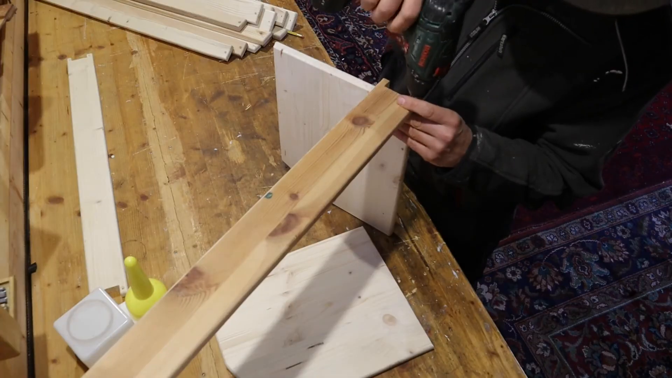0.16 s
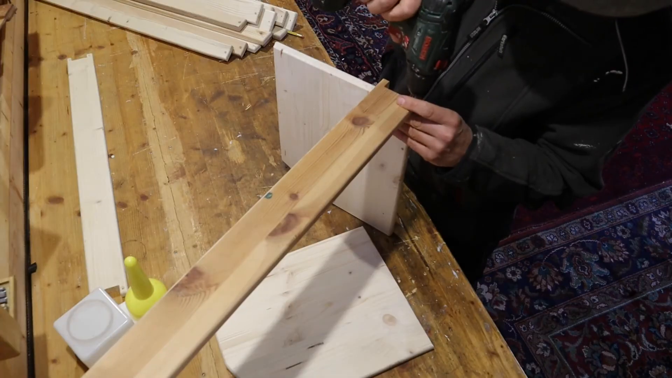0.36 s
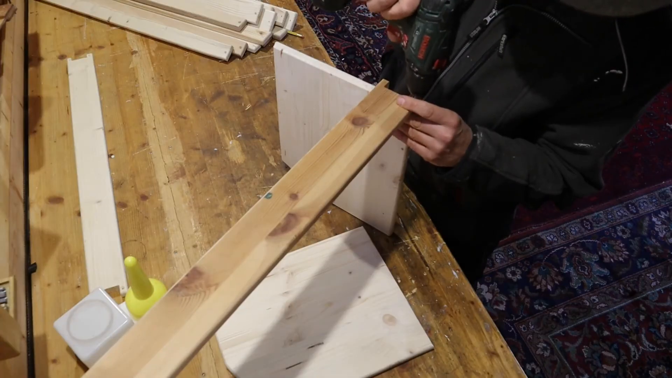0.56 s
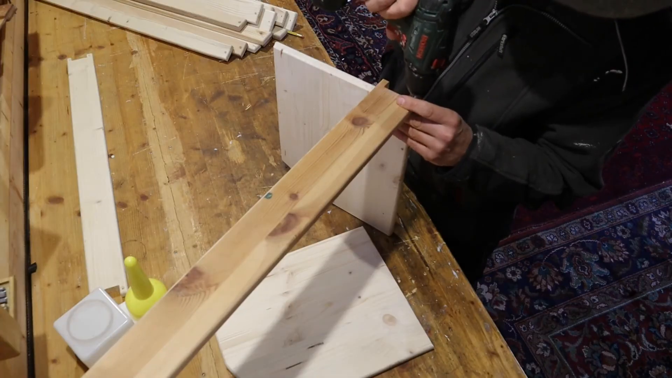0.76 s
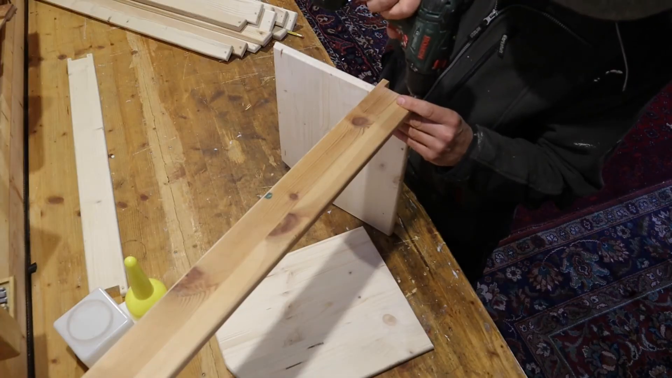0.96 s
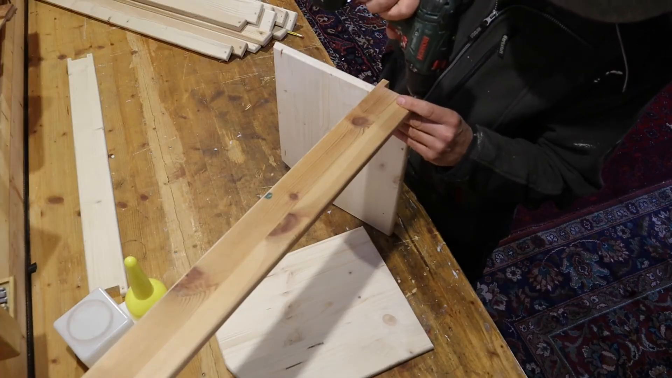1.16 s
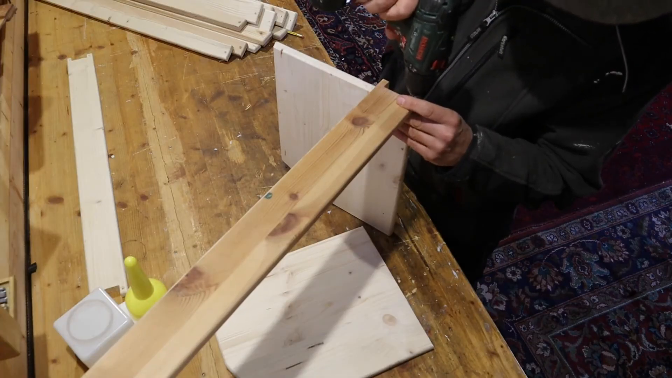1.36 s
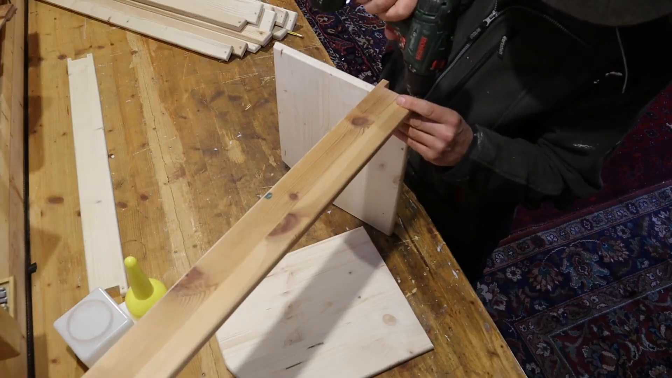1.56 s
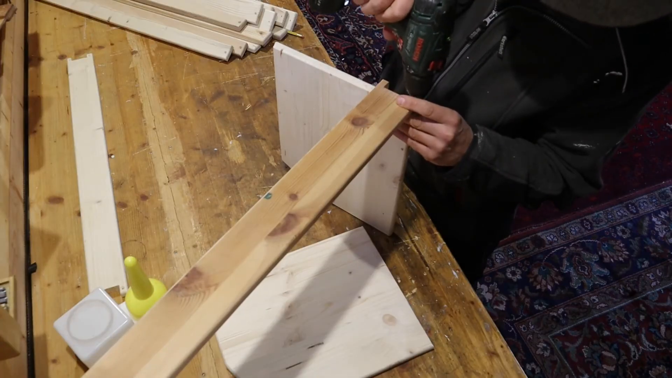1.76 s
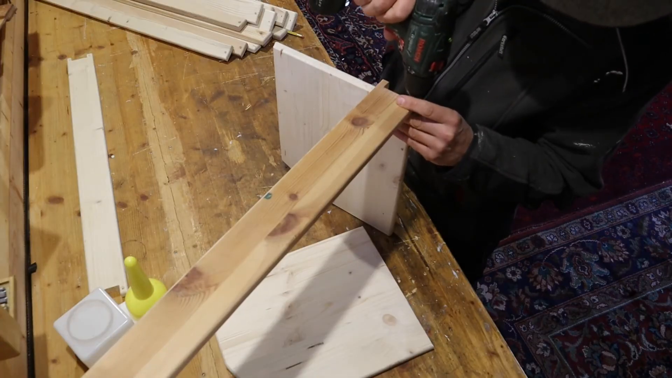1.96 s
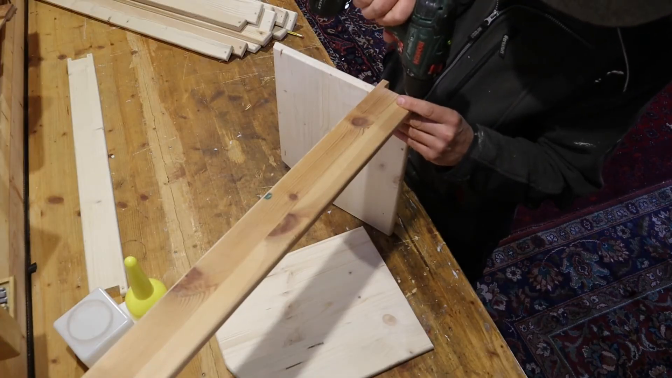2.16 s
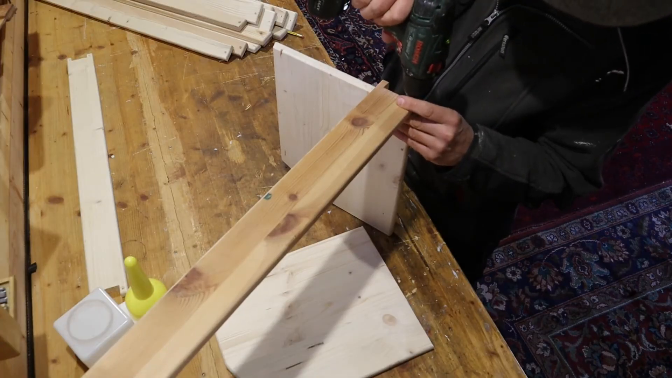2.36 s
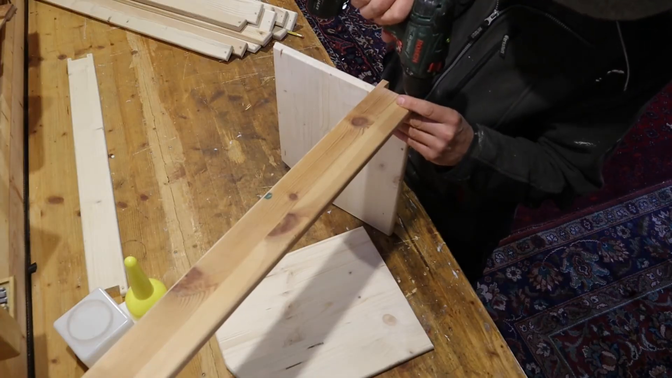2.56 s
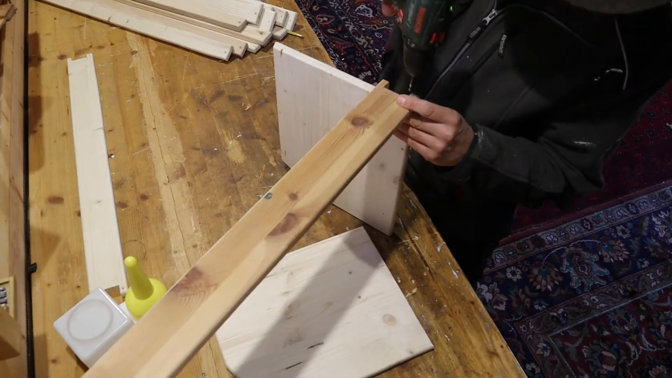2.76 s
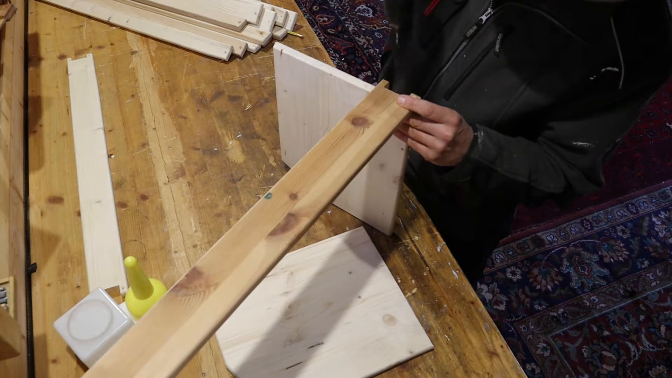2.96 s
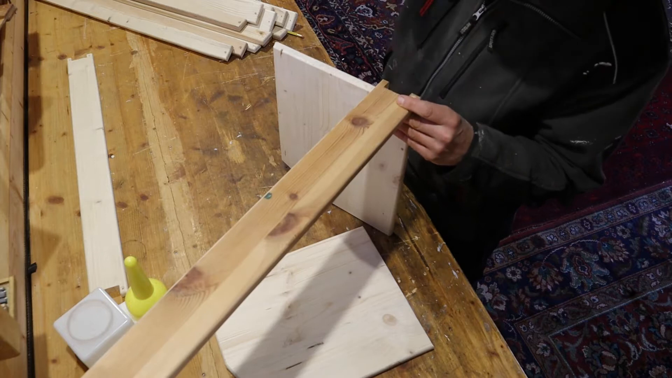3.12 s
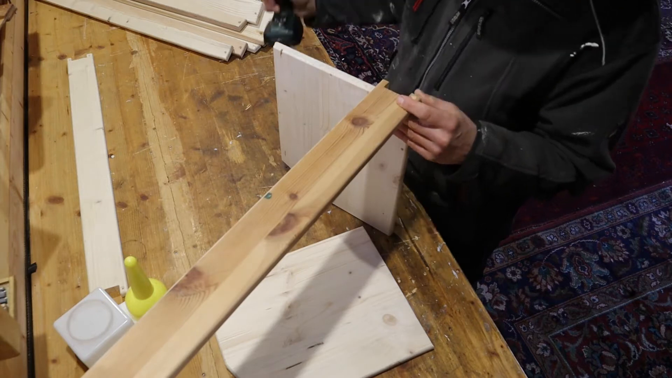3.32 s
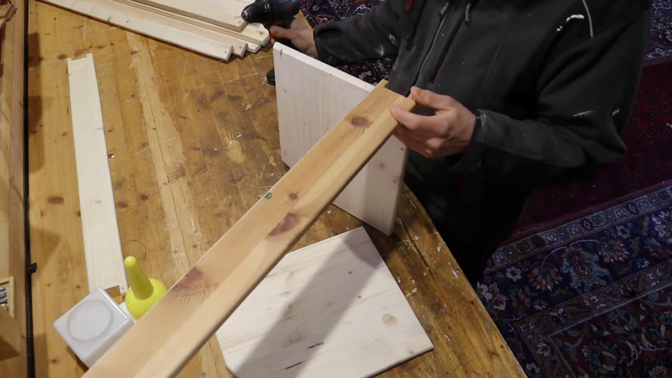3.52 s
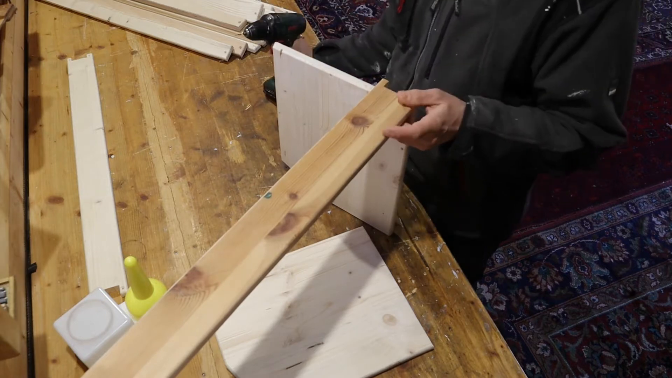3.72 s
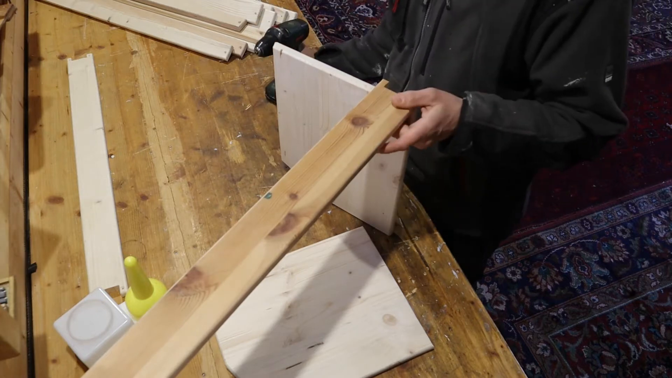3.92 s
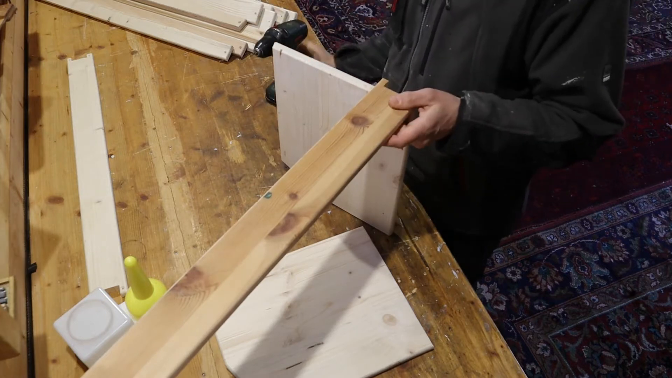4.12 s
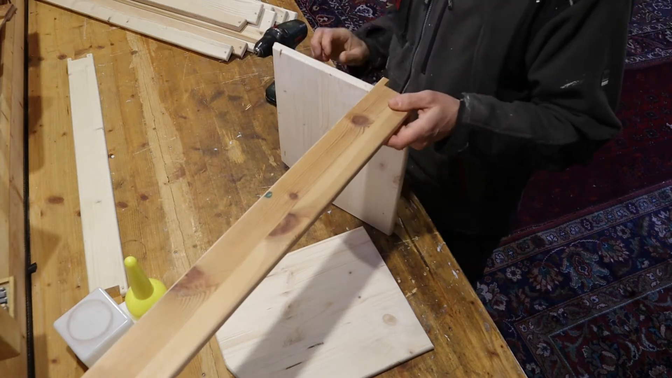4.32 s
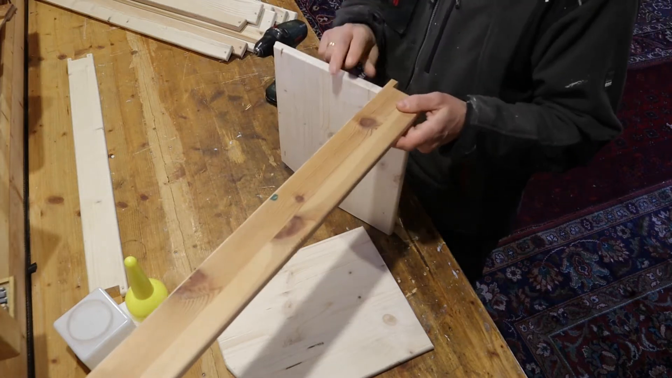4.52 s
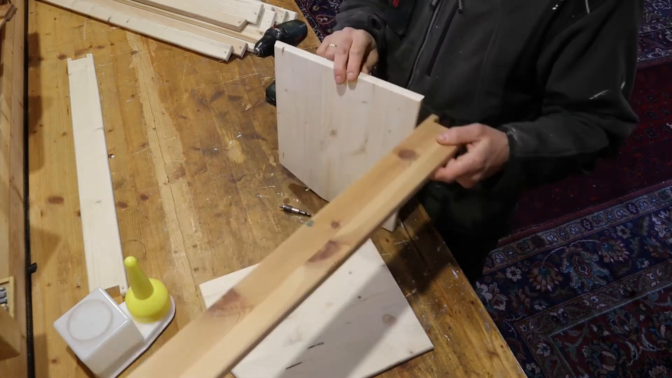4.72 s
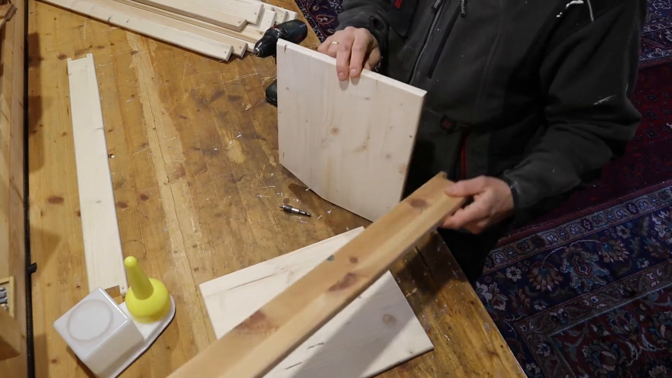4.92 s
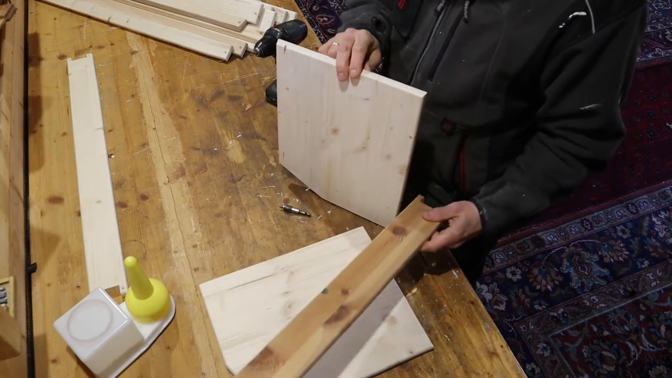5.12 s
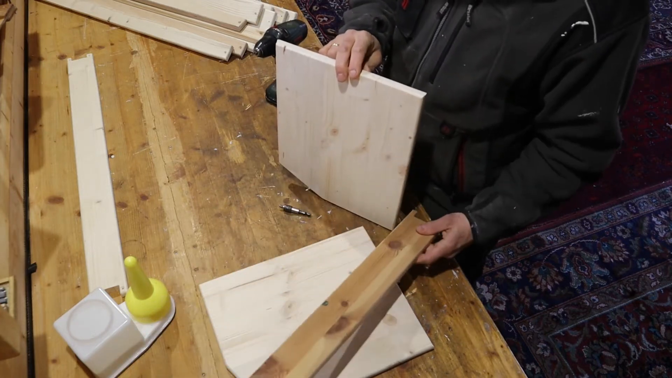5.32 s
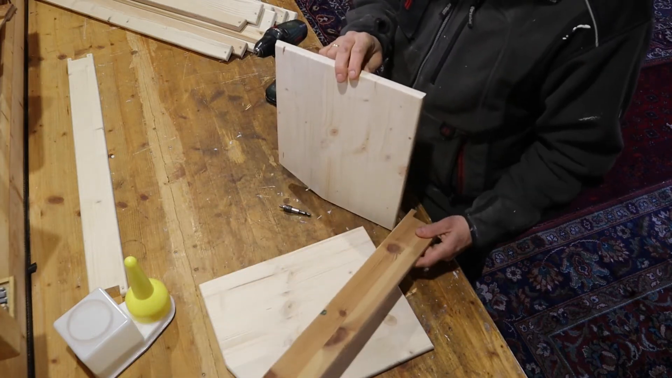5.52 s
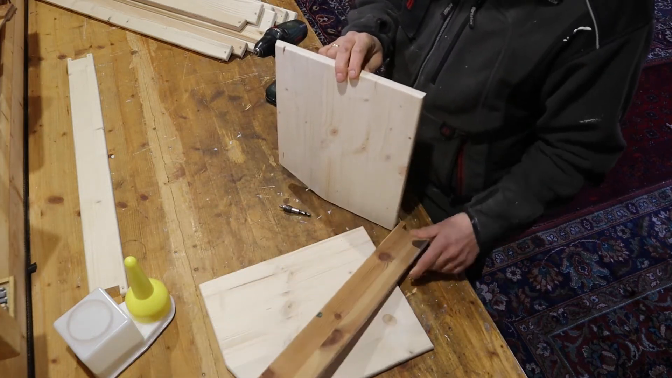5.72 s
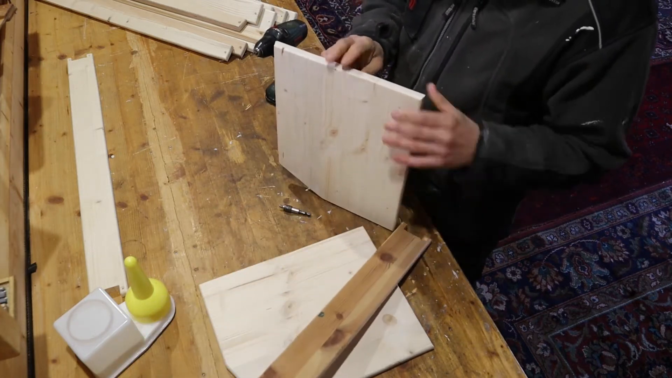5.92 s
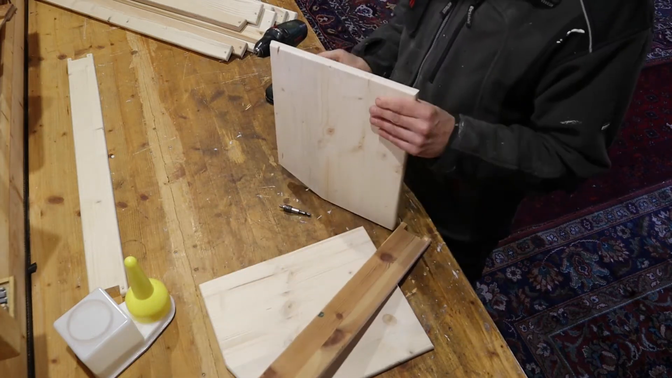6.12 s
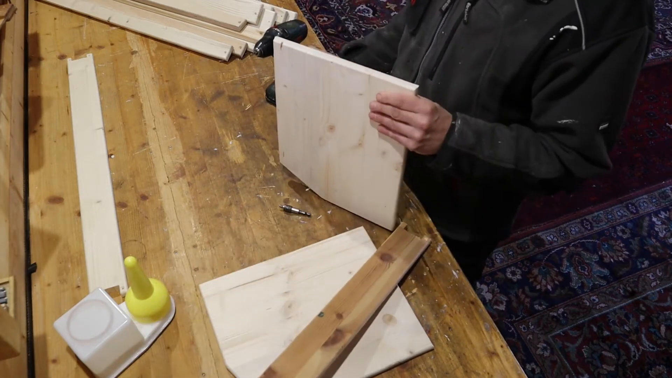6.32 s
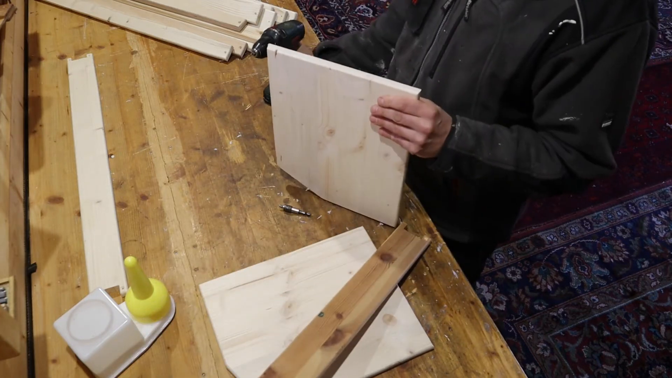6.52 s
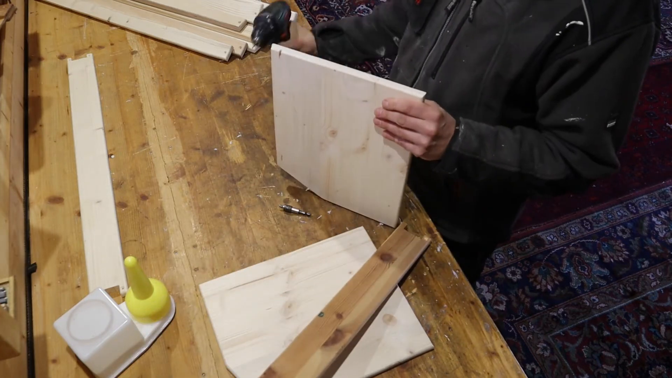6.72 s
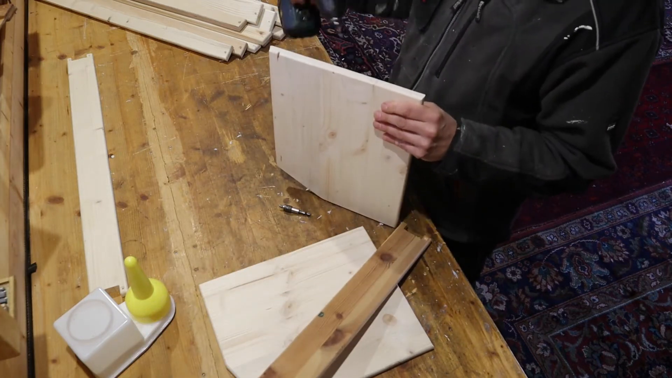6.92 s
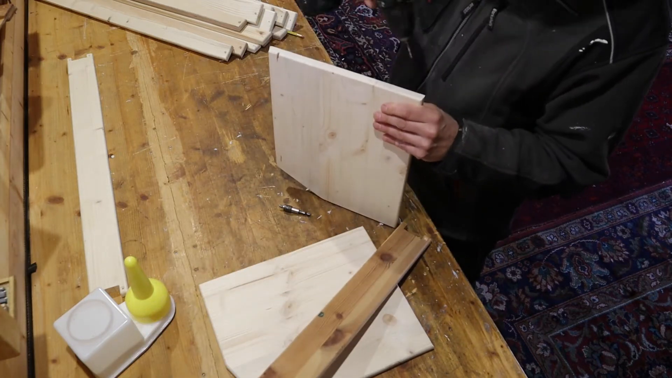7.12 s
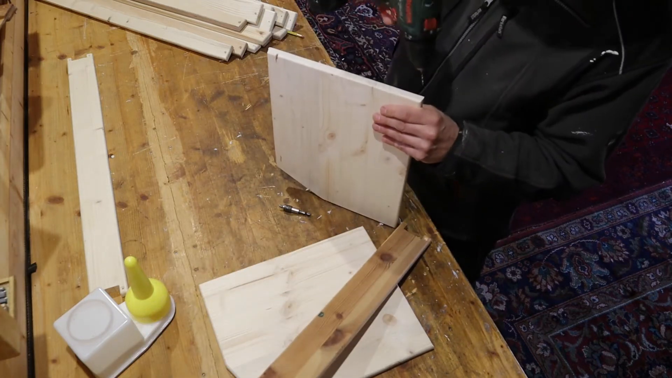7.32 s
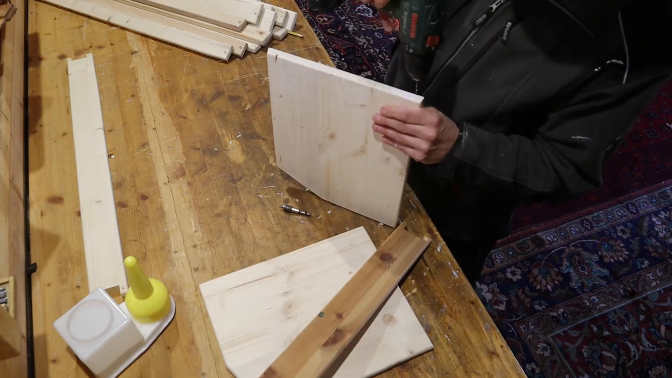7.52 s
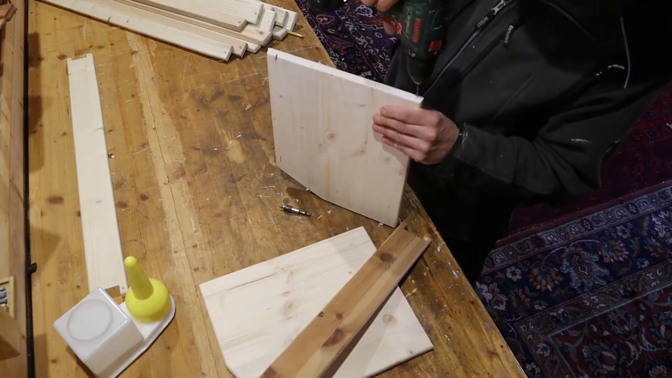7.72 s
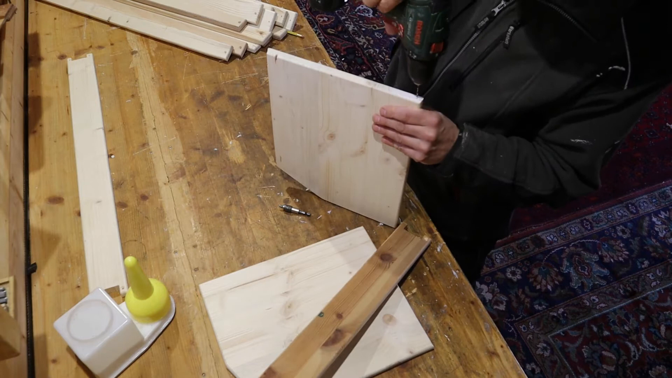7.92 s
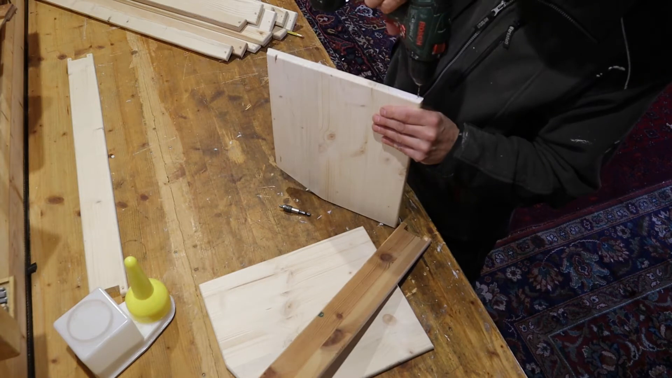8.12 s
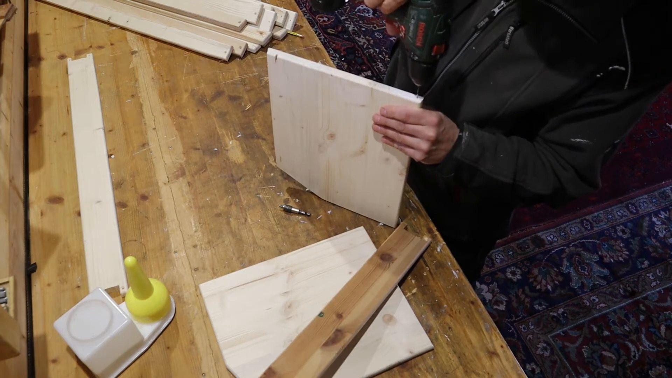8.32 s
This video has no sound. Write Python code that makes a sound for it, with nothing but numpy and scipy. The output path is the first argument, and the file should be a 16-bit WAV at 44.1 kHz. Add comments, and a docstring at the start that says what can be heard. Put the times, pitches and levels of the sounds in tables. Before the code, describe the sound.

In a workshop, a cordless drill starts with a click, whines at part speed, then climbs higher as it bores into a plank with a low growl. It brakes sharply and thuds onto the bench. Boards knock together, and the plank scrapes onto a hollow panel, ringing as it rubs. The drill restarts slowly and quietly at the end. Close microphones also catch rustling sleeves and a low rumble.

```python
"""Cordless drill and boards in a workshop

A drill whines up to speed, its rotor knocking and brushes hissing, bores into a plank and brakes.
It thuds onto the bench. Boards knock together, and the plank slides onto a hollow panel, ringing
as it rubs. Then the drill starts again slowly. Low rumble, room tone and rustling sleeves lie
underneath, heard through a close pair of microphones."""
import sys
import numpy as np
from scipy import signal
from scipy.fft import rfft, irfft, next_fast_len
from scipy.io import wavfile
from scipy.ndimage import uniform_filter1d

SR = 44100
rng = np.random.default_rng(int(sys.argv[2]) if len(sys.argv) > 2 else 0)


def master_out(mix):
    """Clip the mix to full scale and print it as 16-bit PCM to the path in sys.argv[1]."""
    frames = np.transpose(np.atleast_2d(mix))
    ceiling = np.clip(frames, -1, 1)
    pcm = np.round(ceiling * 32767).astype(np.int16)
    wavfile.write(sys.argv[1], SR, pcm)


N = 373968
T = np.arange(N) / SR
FFT_HZ = np.maximum(np.fft.rfftfreq(N, 1 / SR), 1)

# The boring run, then the slow restart. The whine sits at three times the rotor speed.
# Each run: time_s, whine_hz, motor_db, whine_over_motor_db, boring_db
DRILL_RUNS = [
    [(.86, 241.3, -51.5, -25, -57), (.928, 258, -53, -22, -46), (.94, 257.5, -42, -16, -38),
     (.985, 288, -36.5, -3, -37.5), (1.05, 340, -33, -7.5, -50), (1.085, 352.3, -34, 2, -47),
     (1.13, 370, -34, 1.5, -44), (1.2, 380, -34, 1.5, -43), (1.45, 386.6, -33.5, 2, -45),
     (1.66, 383.5, -33, 1.5, -44.5), (1.76, 437, -31.5, -5, -40.5), (1.87, 518, -27.5, -4.5, -38.5),
     (1.92, 583.5, -29, -2.5, -42.5), (1.95, 663, -29.5, -1.5, -39), (1.99, 733, -28, -1, -34),
     (2.06, 803, -27.5, 4.5, -41.5), (2.2, 863.7, -26.5, 3.5, -30), (2.43, 845, -25, -2, -25),
     (2.58, 848.3, -26, 4.5, -30), (2.72, 878, -26.5, -7, -42), (2.82, 890.4, -28.5, 6.5, -46.5),
     (2.9, 830, -27.5, 1, -54), (3.0, 720.5, -31.5, 6.5, -78)],
    [(8.09, 189.9, -51, -30, -64), (8.12, 194, -52, -25, -74), (8.22, 205.2, -49.5, -28, -82),
     (8.35, 208.9, -49.5, -30, -78), (8.4, 217, -47.5, -16, -68), (8.48, 232.7, -48, -17, -52)],
]
# Finger on the trigger: time_s, stage (0 part way, 1 being squeezed, 2 fully in)
TRIGGER = [(1.68, 0), (1.76, 1), (1.925, 1), (1.94, 2), (3.1, 2), (3.2, 0)]
# Colour of the gear noise: freq_hz, level_db
GEAR_COLOUR = [(210, -10), (350, -15), (396, -11), (852, 0.5), (996, -4.5), (1440, 4), (2270, 1.5),
               (2560, 2.5), (3620, -6.5), (5000, -3), (6500, -4), (11000, -120)]


def drill():
    """Whine, rotor knock and brush hiss follow the speed; gears and bit swell on level curves."""
    (stage,), _ = in_time(TRIGGER)
    (first, first_on), (restart, restart_on) = (in_time(run) for run in DRILL_RUNS)
    whine_hz, motor_db, whine_db, boring_db = np.where(T < DRILL_RUNS[1][0][0] - .1, first, restart)
    turns = np.cumsum(whine_hz / 3 * (1 + 0.0018 * drift(34.2))) / SR
    tones = motor_whine(turns, whine_hz, motor_db + whine_db, stage)
    tones += first_on * rotor_hum(turns, motor_db, stage) + switching_tone()
    knock_db = np.minimum(np.interp(stage, (0, 1, 2), (-42.5, -38.5, -48.5)), motor_db + 4)
    knock_db += 7.5 * restart_on   # a rotor that barely turns knocks harder
    knock = amp(knock_db) * rotor_knock(turns)
    hiss = brush_hiss(turns)
    hiss_db = motor_db + 6.5 + 6.5 * np.minimum(np.log2(whine_hz / 407), 0)   # fades at low speed
    gears = amp(motor_db) * coloured(grains(6000, 0.5), GEAR_COLOUR) * amp(drift(6.3))
    running = tones + knock + amp(hiss_db) * hiss + gears + boring_bit(boring_db)
    return (first_on + restart_on) * running + brake(hiss)


# Whine harmonics 1, 2, 3, 4, 5 and 7 by trigger stage: part_way_db, squeezed_db, fully_in_db
WHINE_HARMONICS = [(8, -1, -8.5), (-18, -6, -15.5), (0.5, 4, -25.5), (-3.5, -10, -8.5), (-7, -2, -25),
                   (-16.5, -18.5, -29)]
# Response of the casing: freq_hz, gain_db
CASING_COLOUR = [(250, -8), (400, -9), (530, 13.5), (680, 8), (880, 0.5), (1150, 3), (1400, -3.5),
                 (1750, 3), (2100, 5.5), (3500, 1.5), (6000, 14)]


def motor_whine(turns, whine_hz, level_db, stage):
    """Harmonics sweep through the casing's resonances and waver more once the trigger is squeezed."""
    waver_db = 1.1 * (1 + 1.5 * np.minimum(stage, 1))
    whine = 0
    for k, stages_db in zip((1, 2, 3, 4, 5, 7), WHINE_HARMONICS):
        db = level_db + np.interp(stage, (0, 1, 2), stages_db) + at_hz(CASING_COLOUR, k * whine_hz)
        whine += np.sqrt(2) * amp(db + waver_db * drift(16)) * np.sin(2 * np.pi * 3 * k * turns)
    return whine


# Rotor partials against the motor level: multiple, part_speed_db, full_speed_db
ROTOR_PARTIALS = [(1, -40, -17), (2, -13, -26), (4, -11, -24), (5, -11, -24), (7, -18, -26), (8, -16, -26),
                  (10, -13, -26), (14, -15, -30), (17, -15, -30), (18, -16, -30), (20, -10, -30)]


def rotor_hum(turns, motor_db, stage):
    """Faint wavering partials at multiples of the rotor speed."""
    hum = 0
    for k, part_db, full_db in ROTOR_PARTIALS:
        db = motor_db + np.interp(stage, (0, 2), (part_db, full_db)) + 2 * drift(10)
        hum += np.sqrt(2) * amp(db) * np.sin(2 * np.pi * (k * turns + rng.random()))
    return hum


def switching_tone(start_s=1.2, end_s=1.7, pitch_hz=4091, level_db=-45):
    """The switch chops the current at part speed: a thin, steady tone."""
    _, gate = in_time([(start_s, 0), (end_s, 0)])
    return gate * amp(level_db) * np.sin(2 * np.pi * pitch_hz * T)


# Resonances of the housing: pitch_hz, width_hz, level_db
HOUSING_MODES = [(603, 90, 0), (780, 170, -2), (1150, 170, -7), (1500, 250, -13), (2100, 250, -11),
                 (2500, 150, -22)]


def rotor_knock(turns):
    """One knock a turn rings the housing, with loose gear teeth tapping in between."""
    beats = np.diff(np.floor(turns), prepend=0) * amp(1.6 * rng.standard_normal(N))
    taps = beats + amp(-11) * grains(per_s=700, spread_db=1)
    housing = sum((-1) ** k * amp(db) * ring(taps, hz, 2.2 / width_hz)
                  for k, (hz, width_hz, db) in enumerate(HOUSING_MODES))
    return rms_one(filtered(housing, 2, 430, "high"))   # a small housing radiates no bass


# Colour of the brush hiss: freq_hz, level_db
BRUSH_COLOUR = [(2120, -17), (3600, -16), (3710, -6), (4410, -10.5), (4790, -11.5), (5840, -6.5),
                (6800, -5.5), (7590, 0), (8430, -8.5), (9310, 3.5), (9640, 3), (11200, -0.5),
                (12000, -10.5), (13700, -12.5), (14500, -31.5)]


def brush_hiss(turns):
    """A fine crackle that throbs as the brushes pass the commutator bars."""
    throb = 1 + 0.081 * np.cos(2 * np.pi * 3 * turns)
    return coloured(throb * grains(9000, 0.18), BRUSH_COLOUR) * amp(drift(23))


# Growl of the wood under the bit: freq_hz, level_db
BORING_COLOUR = [(18, -43), (30, -45), (53, -17), (102, -26), (146, 14.5), (207, -10), (237, 10.5),
                 (290, 14), (600, -1.5), (780, 6.5), (1320, -120)]


def boring_bit(level_db, grab_s=2.278, turn_s=.0695, grab_db=7):
    """The edge grabs once a turn and eases off, shaking the wood and, a little later, the floor."""
    grab = grab_db * (.5 - (T - grab_s) / turn_s % 1)
    wood = coloured(rng.standard_normal(N), BORING_COLOUR) * amp(level_db + 0.92 * drift(15) + grab)
    floor_db = np.roll(level_db, int(0.12 * SR)) - 2.5
    floor = coloured(rng.standard_normal(N), RUMBLE_COLOUR) * amp(floor_db + 1.4 * drift(20))
    return wood + floor


# Jolts of the casing: start_s, level_db, pitch_hz, t60_s
CASING_JOLTS = [(2.998, -10, 640, .045), (3.006, -14, 1340, .03), (8.104, -33, 5900, .02)]


def brake(hiss):
    """The brushes spit as the brake shorts the motor; a dead stop or catching gears ring the casing."""
    spit = dying([(2.998, -17)], db_per_s=356) * hiss
    return spit + sum(ring(impulses([(s, db)]), hz, t60) for s, db, hz, t60 in CASING_JOLTS)


# Three cue lists of blows; the crack is set against the blow's loudest band.
# Columns: start_s, level_db, bass_db, treble_db_per_octave, crack_db, t60_s
# Trigger, brake, chuck and other small hard ticks
CLICKS = [ (.4, -34.5, 18, -1.5, -7, 0.14), (.415, -50, 27, -3, 13, .078), (.905, -19.5, 11, -5, -19, 0.49),
          (.933, -17, 15, 1, 2.5, 0.12), (1.929, -29, 12, -17, 10, 0.077),
          (2.999, -3, -34, -1.5, -1.5, 0.052), (3.007, -14, -29, 3.5, 6.5, 0.11),
          (3.055, -16, -19, -2, 3, 0.095), (3.136, -44.5, -6, 7.5, -1, 0.15), (3.35, -47, 7, 4, 0, 0.17),
          (4.0, -51.5, 41, 7.5, 5, 0.1), (4.581, -26.5, 5, -4.5, -5, 0.045),
          (6.754, -79.5, 22, 12.5, -24, .08), (6.978, -55.5, 13.5, 5.5, 1, 0.064),
          (8.035, -52, 0, 9, 10, 0.15), (8.105, -40, -5, 5.5, 15, 0.096)]
# The drill lands on the bench and rocks; a board end meets the floor
THUDS = [(0.069, -76, 4, 14, 11, 0.17), (3.749, -10.5, 0.44, 3, 10, 0.13), (3.976, -30.5, 8.9, -1, 2, 0.19),
         (4.09, -40.5, 1.9, -3, 8, 0.74), (5.313, -49.5, 8.8, 7.5, -27, 0.49)]
# Boards knock together
BOARD_KNOCKS = [ (4.643, -51.5, 35, 5, 0, 0.41), (4.708, -8.5, 5.5, 5, -2.5, 0.093),
                (4.862, -17, 21.5, 5, -3, 0.092), (4.873, -4.5, 11, -5, -9, 0.025),
                (4.913, -29.5, 18.5, 5, 0, 0.35), (5.017, -48.5, 25, 7.5, 1, 0.086),
                (5.117, -50, -12, 1.5, 4, 0.057), (5.262, -10, 4, 1.5, -9, 0.075),
                (5.286, -10, 5, -2.5, -39, 0.069), (5.298, -36.5, 1, 8.5, -17, 0.18),
                (5.350, -52.5, -5, 11.5, -2, 0.095), (5.529, -13, 2.5, -7.5, -30, 0.11),
                (5.582, -40, 9, 8.5, 4, 0.28), (5.697, -31, 8, -4, -18, 0.72),
                (5.823, -3.5, 7, 0.5, -9, 0.1), (5.831, -15, 18, 4.5, -6, 0.035),
                (5.895, -14, 19, -39, -1, 0.14), (5.919, -8.5, 3, -20, 0, 0.052),
                (5.932, -7.5, -29, 2.5, -5.5, 0.078), (6.146, -10.5, -13, -3, 4, 0.29),
                (6.358, -12.5, 11, 4.5, 0, 0.25), (6.551, -25, 10.5, -6, -4, 0.57),
                (6.686, -55, -6, 11, -6, 0.091), (6.723, -40.5, 5, -19, -30, 0.077),
                (6.955, -67, 4, -6, 3.5, 0.07), (7.821, -29, 17, -8.5, -4, 0.32),
                (8.007, -22.5, 8, -3.5, -4, 0.49)]
# The six bands of a blow: band_hz
BANDS_HZ = [70, 220, 660, 1750, 4300, 9200]
# Colour of each kind of blow, band by band: gain_db
CLICK_COLOUR = [-51.5, -29, -10.5, -3.5, -1.5, -15]
THUD_COLOUR = [-10, -7, -3.5, -7, -9.5, -26]
BOARD_COLOUR = [-37, -17, -3, 0, -17, -33.5]


def blows():
    """Voice each blow by tilting the colour of its kind. Small ticks ring the wood less."""
    octaves = np.log2(np.array(BANDS_HZ) / 660)
    bass_share = (octaves < 0) * np.where(octaves < -2, 0.16, 1)   # little reaches the lowest band
    kinds = (CLICKS, CLICK_COLOUR, -5.5), (THUDS, THUD_COLOUR, 0), (BOARD_KNOCKS, BOARD_COLOUR, 0)
    voiced = []
    for cues, colour_db, ring_db in kinds:
        for s, db, bass_db, treble_db, crack_db, t60 in cues:
            band_db = db + np.array(colour_db) + bass_db * bass_share + treble_db * np.maximum(octaves, 0)
            voiced.append((s, band_db.max() + crack_db, band_db, max(t60, .03), ring_db))
    return voiced


# Attack of the noise burst against the blow, band by band: gain_db
BURST_DB = [7, -6.5, -8, -11.5, -9, 0.5]


def knocks():
    """Each blow is a crack of first contact, a burst that dies sooner in the treble, and ringing wood."""
    track, t = np.zeros(N + SR), T[:SR // 2]
    white = rng.standard_normal(N + SR)
    edges_hz = [(hz / 1.42, min(hz * 1.794, 15000)) for hz in BANDS_HZ]
    noises = [rms_one(filtered(white, 3, edges, "band")) for edges in edges_hz]
    clicks = np.array([filtered(1. * (t == 0), 3, edges, "band") for edges in edges_hz])
    clicks /= np.max(np.abs(clicks), axis=1, keepdims=True)
    for s, crack_db, band_db, t60, ring_db in blows():
        span = slice(round(s * SR), round(s * SR) + len(t))
        crack = amp(band_db) @ clicks
        track[span] += amp(crack_db) * crack / np.max(np.abs(crack))
        for hz, db, noise in zip(BANDS_HZ, band_db + BURST_DB, noises):
            rise = np.minimum(t * hz, 1)   # a band needs a cycle to build up
            fall_db = 60 * t / t60 * (hz / 660) ** 0.41
            track[span] += rise * noise[span] * amp(db - fall_db)
        track[span] += wood_ring(t, s, band_db + ring_db, t60)
    return track[:N]


# Modes of the bench and of a board: pitch_hz, level_db, longest_t60_s
BENCH_MODES = [(61.7, 0.5, 0.695), (79, 19, .5), (109.5, 12.5, 0.87), (156, -22, 0.14), (251.3, -2.5, 0.45)]
BOARD_MODES = [(281.5, -6, 0.15), (336, -2, 0.075), (437, 4.5, 0.037), (516.5, 4, 0.045), (590, 2.5, 0.081),
               (774, 0.5, 0.044), (838, -20.5, 0.14), (1212, -5, 0.016), (1360, -35.5, 0.067),
               (1800, -11.5, 0.04), (1884, -5, 0.075), (2126, -4, 0.038), (2335, 1.5, 0.025),
               (3255, 4, 0.0075), (4180, 4.5, 0.0082)]
# Where a blow lands favours the modes near one pitch: start_s, pitch_hz, gain_db
STRIKE_SPOTS = [(3.136, 2335, 11.5), (4.581, 1990, 20), (4.708, 1900, 6.5), (5.262, 580, 5.5),
                (5.286, 595, 6.5), (5.831, 1250, -1), (5.933, 2310, 6.5), (6.357, 3120, 7),
                (6.978, 1860, 18), (8.007, 596, 4.5)]


def wood_ring(t, start_s, band_db, blow_t60):
    """Bench and board modes take on the colour of the blow; a short blow cuts their ring short."""
    colour, wood = list(zip(BANDS_HZ, band_db)), 0
    for hz, mode_db, longest_t60 in BENCH_MODES + BOARD_MODES:
        spot_db = sum(db * np.exp(-(np.log2(hz / near_hz) / .2) ** 2)
                      for s, near_hz, db in STRIKE_SPOTS if abs(s - start_s) < .004)
        level_db = at_hz(colour, hz) + mode_db + spot_db - 5 + 1.53 * rng.standard_normal()
        t60 = max(min(longest_t60, 1.32 * blow_t60), .01)
        rise = np.minimum(t * hz, 1)
        wood += rise * amp(level_db - 60 * t / t60) * np.sin(2 * np.pi * hz * t)
    return wood


# The sliding gesture: time_s, body_db, push_db
SLIDE_MOVE = [(5.66, -64, -59), (5.81, -66, -73), (5.83, -66, -62), (5.9, -49, -31), (5.935, -46, -26),
              (5.96, -52, -23.5), (6.0, -29, -22.5), (6.07, -25, -21), (6.135, -27, -26.5),
              (6.154, -23, -22.5), (6.23, -28.5, -26.5), (6.326, -40, -34), (6.364, -21, -55),
              (6.5, -34, -31), (6.726, -61, -87), (6.8, -78, -79)]
# Modes of the plank: pitch_hz
PLANK_HZ = [221, 388, 592, 689, 743, 814, 877, 931, 1007, 1114, 1150, 1233, 1410, 1519, 1626, 1707, 1761,
            1954, 2008, 2195, 2250, 2422, 2509, 2745, 2966, 3305, 4226, 4280, 5216, 5588, 6347]
# The ring of each of those modes: level_db, t60_s
PLANK_RING = [(-16, 0.44), (-19, 0.71), (-8, 0.35), (-11, 0.6), (-5, 0.25), (-8, .3), (-12, 0.55),
              (-6, 0.3), (-11, 0.25), (-8, 0.25), (-11, 0.45), (-10, 0.25), (-2, 0.35), (-1, .3),
              (-6, 0.65), (-4, 0.3), (-9, 0.45), (-10, 0.28), (-12, 0.35), (-7, 0.5), (-9, 0.35), (-13, .3),
              (-10, 0.26), (-13, 0.2), (-11, .3), (-13, .3), (-11, .3), (-10, .3), (-12, .27), (-12, .16),
              (-14, .22)]
# Lying on the panel, the plank is rubbed elsewhere and feeds other modes: freq_hz, gain_db
LANDED_COLOUR = [(600, 0), (689, 5), (743, -6), (877, 2), (1007, -8), (1150, 2), (1233, -6), (1410, -8),
                 (1519, -10), (1626, 7), (1707, -6), (2008, -4), (2195, 3), (2250, 2), (2500, -3)]
# Colours of the plank's body and of its surface hiss: freq_hz, level_db
BODY_COLOUR = [(71, -50), (120, -69), (219, 8), (254, -22), (386, -24), (472, -42), (577, 11), (627, -20),
               (729, -2), (1290, 2), (1740, 7), (6500, -22.5), (8450, -65), (14300, -120)]
SURFACE_COLOUR = [(1470, -34), (2500, -2.5), (3480, -12), (4390, -8.5), (4820, -16), (6340, -11),
                  (9690, -10), (11900, -17), (14000, -61)]


def plank_slide(lands_s=6.33, push_cut_hz=2600):
    """Dense rubbing shakes the plank's body, feeds its long-ringing modes and hisses at the surface."""
    (body_db, push_db), gate = in_time(SLIDE_MOVE)
    rub = rms_one(grains(6000, 0.14))
    strikes = impulses([(s, db - 6.5) for s, db, *_ in BOARD_KNOCKS])   # knocks ring the sliding plank
    strikes = filtered(strikes + 1e-18, 4, push_cut_hz, "low")
    scuffs = dying([(6.146, -20.5), (6.358, -24)], db_per_s=189)   # the surfaces bite twice
    # Slow rubbing misses the high modes; the scuffs reach them all.
    push = filtered(amp(push_db) * rub, 4, push_cut_hz, "low") + amp(-2) * scuffs * rub
    modes = 0
    for hz, (db, t60) in zip(PLANK_HZ, PLANK_RING):
        landed = amp((T > lands_s) * at_hz(LANDED_COLOUR, hz))
        drive = gate * landed * (push + rng.choice([-1, 1]) * strikes)
        modes += amp(db) * ring(drive, hz, t60) * np.sqrt(20 / (t60 * SR))
    body = amp(body_db) * coloured(rub, BODY_COLOUR)
    surface = (amp(push_db - 55) + scuffs) * coloured(rub, SURFACE_COLOUR)
    return modes + gate * (body + surface)


# Hollow body of the upright panel: pitch_hz, level_db, t60_s
PANEL_MODES = [(318, 0, .06), (478, -1, .05), (742, -5, .15)]
# The bit's hardest grabs, then bumps of plank and hands: start_s, level_db
PANEL_BUMPS = [(2.283, -23), (2.418, -17), (2.556, -24), (4.863, -14), (4.869, -10), (4.914, -17),
               (5.826, -14), (6.362, -21), (6.43, -26), (6.726, -33), (6.955, -39)]


def panel():
    """Each bump sets the panel's low modes ringing."""
    bumps = impulses(PANEL_BUMPS)
    return sum(amp(db) * ring(bumps, hz, t60) for hz, db, t60 in PANEL_MODES)


# Level rides of the background: time_s, rumble_db, rustle_db
AMBIENCE_LEVELS = [(0.0, -33.5, -52.5), (0.21, -48.5, -55.5), (0.75, -46.5, -59.5), (3.1, -52, -60.5),
                   (3.7, -46, -58), (4.5, -45, -54), (4.75, -34.5, -63), (5.08, -46, -70),
                   (5.8, -49.5, -48), (6.1, -77, -55), (6.45, -63, -50), (6.66, -42, -56.5),
                   (6.92, -46, -81.5), (7.3, -49.5, -63), (7.9, -48.5, -65), (8.48, -54, -50.5)]
# Colours of floor rumble, room tone and sleeves: freq_hz, level_db
RUMBLE_COLOUR = [(12, -35), (20, -7.5), (49, 9.5), (62, -10), (70, -4.5), (156, -10), (200, -16.5),
                 (260, -61), (440, -120)]
ROOM_TONE_COLOUR = [(71, -45), (120, -10), (302, -1), (334, -4.5), (489, -5.5), (647, -4), (1210, -9),
                    (1310, -9.5), (1800, -12.5), (2640, -16), (14500, -31)]
SLEEVE_COLOUR = [(700, -14), (1300, 8), (2030, 9), (2580, 8), (4470, 3), (5600, 1), (7500, -4), (10100, 8),
                 (12000, 0.5), (14500, -13)]


def ambience(tone_db=-54.5, side_boost_db=4):
    """A floor that rumbles and booms after each thud, wide room tone and patchy sleeve rustle."""
    (rumble_db, rustle_db), _ = in_time(AMBIENCE_LEVELS)
    boom = dying([(s, db + bass_db - 8) for s, db, bass_db, *_ in THUDS], db_per_s=81)
    swell = (amp(rumble_db) + boom) * amp(3 * drift(8))
    rumble = swell * coloured(rng.standard_normal(N), RUMBLE_COLOUR)
    mid, side = (amp(tone_db) * coloured(rng.standard_normal(N), ROOM_TONE_COLOUR) for _ in range(2))
    sleeves = amp(rustle_db + 1.8 * drift(8)) * coloured(grains(8000, 0.73), SLEEVE_COLOUR)
    return rumble + mid, amp(side_boost_db) * side, sleeves


# EQ of the reverb: freq_hz, gain_db
REVERB_COLOUR = [(60, 5), (500, 3.5), (3000, -5.5), (6000, 1), (12000, 10.5)]


def workshop_reverb(send):
    """The room's short tail, dying fastest in the top treble."""
    return equalised(echoes(send, [(60, 0.41), (300, 0.38), (2000, 0.44), (10000, 0.13)]), REVERB_COLOUR)


# EQ of the reflections in the side channel: freq_hz, gain_db
SIDE_COLOUR = [(60, -60), (99, -41), (160, -30), (270, -21), (440, -13), (720, -11), (1180, -8), (1940, -4),
               (3190, -0.5), (5250, 0), (8620, -8), (11500, -10), (14200, -7)]
# The boards are handled left of centre: time_s, side_share
LEFT_LEAN = [(4.3, 0), (4.6, 0.12), (5.1, 0.016), (5.9, 0.022), (6.1, 0)]


def stereo_side(near):
    """The two microphones differ by early and late reflections and by a lean to the left."""
    early = .42 * echoes(near, [(60, .05), (10000, .01)])
    late = .85 * echoes(near, [(60, 0.4), (10000, 0.2)])
    return equalised(early + late, SIDE_COLOUR) + np.interp(T, *np.transpose(LEFT_LEAN)) * near


def echoes(x, t60s):
    """x through reflections that die octave by octave; t60s holds (freq_hz, t60_s)."""
    size, t = next_fast_len(N + SR), T[:SR]
    tail = 0
    for hz in 45 * 2. ** np.arange(9):
        octave = filtered(rng.standard_normal(SR), 2, [hz / np.sqrt(2), hz * np.sqrt(2)], "band")
        tail += octave * amp(-60 * t / at_hz(t60s, hz))
    tail /= np.sqrt(np.sum(tail ** 2))
    return irfft(rfft(x, size) * rfft(tail, size), size)[:N]


def amp(db):
    """dB to gain."""
    return 10 ** (np.asarray(db) / 20)


def rms_one(x):
    """x scaled to rms 1."""
    return x / np.sqrt(np.mean(x ** 2) + 1e-20)


def in_time(rows):
    """A table's columns as curves, and a soft gate open from its first time to its last."""
    s, *columns = np.transpose(rows)
    gate = uniform_filter1d(1. * ((T >= s[0]) & (T <= s[-1])), size=200)
    return [np.interp(T, s, c) for c in columns], gate


def at_hz(points, hz):
    """A curve read on a log frequency axis."""
    freqs, values = np.transpose(points)
    return np.interp(np.log(hz), np.log(freqs), values)


def filtered(x, order, hz, kind):
    """x through a low-, high- or band-pass."""
    return signal.sosfilt(signal.butter(order, hz, kind, fs=SR, output="sos"), x)


def equalised(x, curve):
    """x through an EQ curve of (freq_hz, gain_db)."""
    return irfft(rfft(x) * amp(at_hz(curve, FFT_HZ)), N)


def coloured(x, curve):
    """x shaped by a curve that runs to -70 dB an octave beyond its ends; rms 1."""
    return rms_one(equalised(x, [(curve[0][0] / 2, -70), *curve, (curve[-1][0] * 2, -70)]))


def drift(rate_hz):
    """A smooth random wander, rms 1."""
    r = np.exp(-2 * np.pi * rate_hz / SR)
    return rms_one(signal.lfilter([1], [1, -2 * r, r * r], rng.standard_normal(N + SR))[SR:])


def grains(per_s, spread_db):
    """Random small clicks of uneven size."""
    sizes = amp(spread_db * np.minimum(rng.exponential(1, N), 5)) * rng.standard_normal(N)
    return sizes * (rng.random(N) < per_s / SR)


def impulses(events):
    """One click for each (start_s, level_db)."""
    track = np.zeros(N)
    for s, db in events:
        track[round(s * SR)] = amp(db)
    return track


def ring(x, hz, t60):
    """One mode: a unit click starts a decaying sine of height 1."""
    r, w = amp(-60 / (t60 * SR)), 2 * np.pi * hz / SR
    return signal.lfilter([0, np.sin(w)], [1, -2 * r * np.cos(w), r * r], x + 1e-18)


def dying(events, db_per_s):
    """A gain that jumps at each (start_s, level_db) and falls steadily."""
    return sum((T >= s) * amp(db - db_per_s * np.abs(T - s)) for s, db in events)


def scene():
    """Drill, wood and sleeves with their reverb over the ambience, mixed from mid and side."""
    room_mid, room_side, sleeves = ambience()
    tool = drill()
    handling = knocks() + panel() + plank_slide() + sleeves
    send = amp(-3) * tool + handling   # the drill is nearest, so it is driest
    near = tool + handling + amp(-11.5) * workshop_reverb(send)
    mid, side = room_mid + near, room_side + stereo_side(near)
    return np.array([mid + side, mid - side])


def record(dry):
    """The microphones lose the lowest bass and the top; peaks clip at full scale."""
    heard = np.clip(filtered(dry, 3, [50.8, 10970], "band"), -1, 1)
    return signal.sosfilt(signal.cheby2(12, 70, 16000, fs=SR, output="sos"), heard)


dry = scene()
out = record(dry)
master_out(out)
```